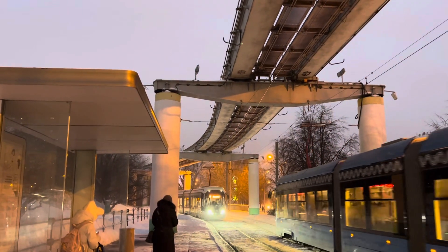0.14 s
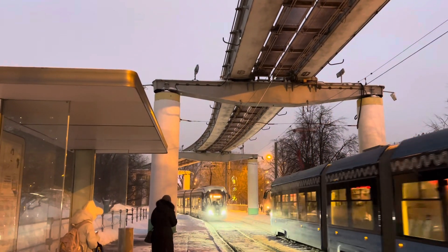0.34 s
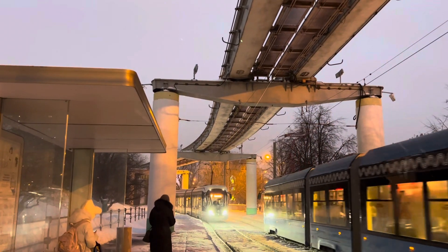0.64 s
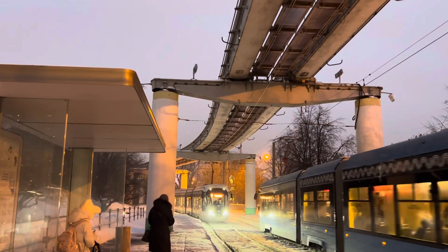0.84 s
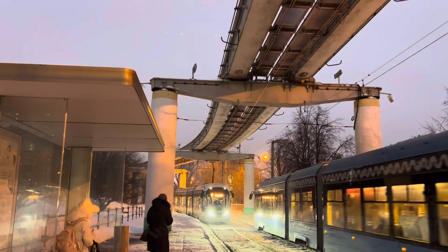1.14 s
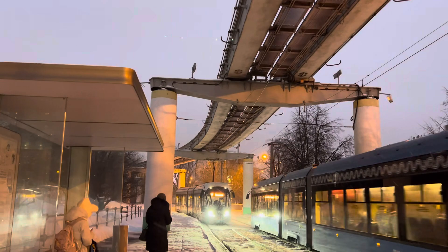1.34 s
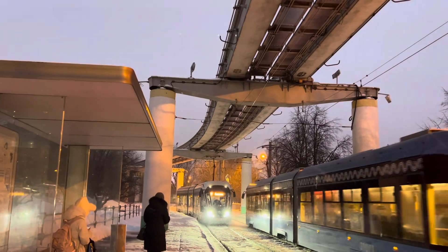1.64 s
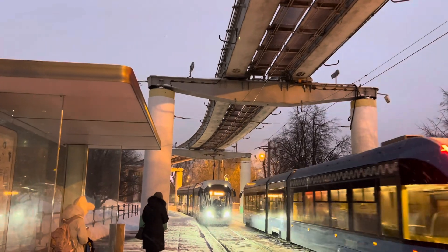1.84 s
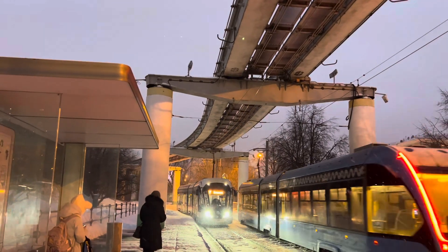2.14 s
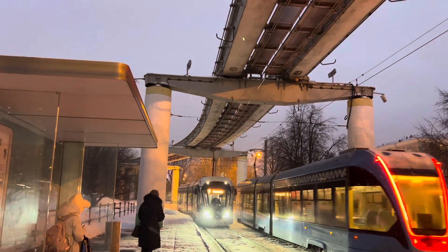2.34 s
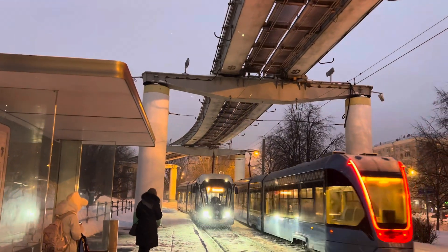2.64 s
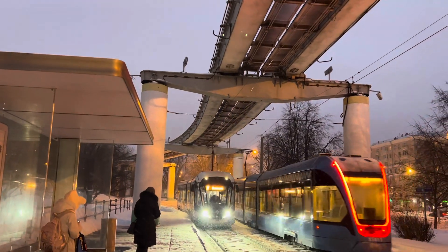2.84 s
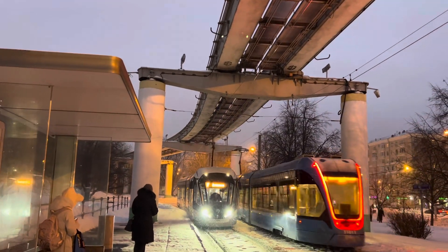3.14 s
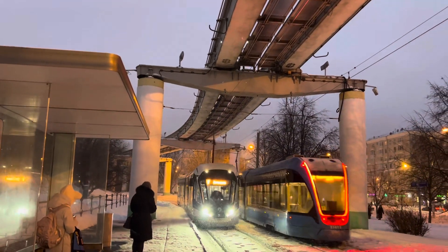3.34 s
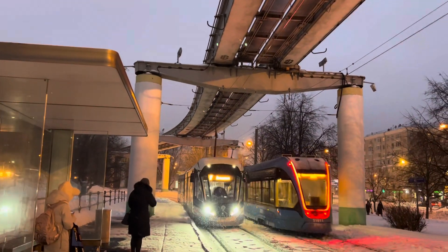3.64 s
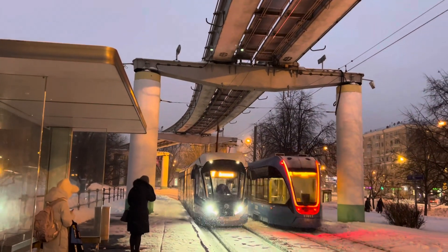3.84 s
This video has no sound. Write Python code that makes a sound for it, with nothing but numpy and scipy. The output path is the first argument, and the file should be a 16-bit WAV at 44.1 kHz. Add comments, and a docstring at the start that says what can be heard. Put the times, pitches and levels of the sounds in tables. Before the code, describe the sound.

Tram wheels knock dully over rail joints, densest around one second, then in spaced pairs; the rolling rumble weakens, a faint wavering whine fades, and a close phone-like microphone catches a short outdoor echo.

```python
"""Tram leaving along a snowy street

Two close microphone ports hear a tram roll away: noise bands for steel on steel, low decaying cycles,
noise bursts and ringing wheel modes for the rail joints, and wavering sines for the whine of the motor drive.
The rails sing as narrow noise, a small compressor ticks in steady puffs, and a few bright snaps stand out.
The street answers the blows with a short noisy echo."""
import sys
import numpy as np
from scipy import signal
from scipy.fft import rfft, irfft, next_fast_len
from scipy.io import wavfile
from scipy.ndimage import uniform_filter1d, map_coordinates

SR = 44100
rng = np.random.default_rng(int(sys.argv[2]) if len(sys.argv) > 2 else 0)


def master_out(mix):
    """Clip the mix to full scale and print it as 16-bit PCM to the path in sys.argv[1]."""
    frames = np.transpose(np.atleast_2d(mix))
    ceiling = np.clip(frames, -1, 1)
    pcm = np.round(ceiling * 32767).astype(np.int16)
    wavfile.write(sys.argv[1], SR, pcm)


N = 176400

# Rolling noise as the tram leaves. Each row: time in seconds, then rumble, roar, hiss and treble levels in dB.
ROLLING_LEVELS = [(0.0, -16, -28, -44.5, -53), (0.38, -22, -30.5, -46.5, -54.5),
                  (0.8, -23, -31, -44.5, -53), (1.09, -32.5, -37.5, -44, -52.5),
                  (1.32, -30, -37.5, -48.5, -54), (1.48, -38.5, -33, -46.5, -58),
                  (1.64, -22.5, -36, -52, -57.5), (1.77, -29, -34, -50, -57.5),
                  (1.98, -28.5, -36.5, -52.5, -58), (2.18, -30, -37.5, -51, -59),
                  (2.62, -32, -37, -51.5, -60), (2.9, -36, -39.5, -48.5, -58.5),
                  (3.11, -32, -39.5, -51, -56.5), (3.22, -29.5, -38, -52.5, -58),
                  (3.52, -35, -38.5, -46, -55), (3.66, -34.5, -40, -49, -53.5),
                  (4.0, -30.5, -36.5, -51, -52)]
# Colours of the four rolling bands. Each row: frequency in Hz, relative density in dB per Hz.
RUMBLE_COLOUR = [(22, -49), (38, -1.5), (54, 6.5), (68, 5), (110, -4.5), (140, -25), (240, -120)]
ROAR_COLOUR = [(62, -48.5), (105, -4), (259, -13.5), (342, -21), (461, -23), (570, -20.5), (681, -23),
               (1000, -32.5), (1350, -36), (1950, -41.5), (3300, -120)]
HISS_COLOUR = [(820, 3), (1400, -1.5), (1960, -3.5), (2250, -4), (2820, -4.5), (4700, -8), (6110, -23.5),
               (10300, -120)]
TREBLE_COLOUR = [(4500, -3.5), (5330, -3.5), (5580, -7.5), (6230, -5.5), (7490, -7), (8610, -13),
                 (9050, -19.5), (9760, -68), (10400, -55.5), (10700, -26), (11400, -12.5), (14800, -19.5)]

# Front motor whine. Each row: time in seconds, level in dB, pitch shift in Hz.
FRONT_MOTOR = [(.15, -76, -16.5), (.27, -53.5, -20), (.6, -60, -7), (1.3, -51.5, -5), (1.36, -57.5, 2),
               (1.45, -50.5, -2), (1.7, -51.5, 2), (1.82, -59.5, 0.5), (1.95, -53, -3), (2.25, -57.5, 1),
               (2.33, -61.5, -7), (2.6, -66, -2), (2.8, -88, 4)]
# Rear motor, still closing in. Each row: time in seconds, level in dB.
REAR_MOTOR_LEVEL = [(.15, -81), (.3, -60), (.85, -56.5), (1.2, -59), (1.45, -61), (1.8, -98)]
# Switching tones of both motors. Each row: frequency in Hz before the shift, dB relative to the motor level.
SWITCHING_TONES = [(4856, -4), (4933, -6), (5010, -3), (5082, -16), (7343, -20), (7424, -22)]
REAR_SHIFT_HZ = 30
FRONT_WAVER_HZ, REAR_WAVER_HZ = 3.5, 14  # random pitch waver, standard deviation of its knots
# Rails singing as the tram passes. Each row: time in seconds, level in dB.
RAIL_LEVEL = [(.5, -62), (.8, -52), (1.4, -55), (1.6, -73.5)]
# Colour of the singing rail. Each row: frequency in Hz, relative density in dB per Hz.
RAIL_COLOUR = [(1200, -120), (1900, -27.5), (2200, 3.5), (2420, 1), (2620, -1), (3600, -13), (5000, -120)]

TICK_FIRST_S, TICK_EVERY_S = 0.02, 0.045
TICK_DB, TICK_ATTACK_DECAY_S = -62, (0.003, 0.005)
# Colour of a compressor tick. Each row: frequency in Hz, relative density in dB per Hz.
TICK_COLOUR = [(4200, -120), (5200, -15), (6200, 0), (7400, -15), (8800, -120)]

# Bright snaps, most on hard blows. Each row: start in seconds, level in dB, decay in seconds.
SNAP_EVENTS = [(0.076, -41.5, 0.001), (.920, -47, 0.0046), (2.632, -48.5, 0.0087), (2.988, -51.5, 0.0052)]
# Colour of a snap. Each row: frequency in Hz, relative density in dB per Hz.
SNAP_COLOUR = [(4000, -120), (6000, -4), (8000, 2.5), (10000, -14), (14000, -1)]

# Wheels at rail joints. Each row: time in seconds, thump peak in dB, thump pitch in Hz,
# then deep boom, body, knock and clank levels in dB.
JOINT_BLOWS = [(0.165, -8, 150, -13.5, -28, -37, -55), (0.422, -22, 185, -19.5, -37.5, -41, -44.5),
               (0.921, -14, 134, -10.5, -26, -29, -37.5), (0.945, -11.5, 151.5, -9, -26.5, -42.5, -39.5),
               (1.018, -19, 126, -16.5, -46, -58, -45.5), (1.162, -21, 127, -21.5, -43.5, -57.5, -49.5),
               (1.241, -11, 136.6, -14, -22.5, -34.5, -35), (1.266, -7.5, 140.2, -18, -39, -39, -49.5),
               (1.276, -12, 126, -28, -38.5, -45, -63), (1.411, -14, 145, -18, -32, -38.5, -46.5),
               (1.744, -9, 151, -26, -34.5, -40, -53), (1.764, -37, 164, -36, -31, -39.5, -58),
               (2.028, -22, 173.7, -30, -37, -44, -60), (2.067, -20.5, 128, -36, -52, -50, -61),
               (2.393, -24, 152, -34, -42, -42.5, -57), (2.633, -16, 172, -21.5, -36.5, -38, -41),
               (2.651, -16, 136, -26, -41, -48, -60), (2.991, -9, 162.7, -41, -32.5, -41.5, -47.5),
               (3.012, -32.5, 172, -34, -31.5, -43, -55), (3.155, -16, 142, -37, -30.5, -35.5, -47),
               (3.178, -20.5, 143, -31, -30, -46, -51), (3.514, -12.5, 153.7, -19, -44, -39, -47),
               (3.532, -25, 131, -18.5, -33.5, -39, -54), (3.714, -27, 184, -30, -27.5, -39.5, -56),
               (3.736, -20.5, 161.7, -22.5, -28.5, -38.5, -51), (3.766, -35, 133, -28.5, -44.5, -62, -59),
               (3.812, -21, 130, -26, -32, -48, -56), (3.848, -25.5, 132, -18, -40, -48.5, -60)]
BOOM_HZ = 79.7
THUMP_SWELL_S, BOOM_SWELL_S = 0.0027, 0.005  # the swell peaks after four of these
THUMP_EARLY_S = 0.0031
# Attack and decay in seconds of the noisy parts of a blow.
BODY_S, KNOCK_S, CLANK_S = (0.0066, 0.013), (0.0045, 0.014), (0.00044, 0.014)
# Colours of the noisy parts. Each row: frequency in Hz, relative density in dB per Hz.
BODY_COLOUR = [(100, -120), (170, 2), (230, 10.5), (350, 0.5), (480, -4), (700, -48), (1500, -120)]
KNOCK_COLOUR = [(280, -120), (500, 7), (900, 4), (1500, -3), (2200, -10.5), (4000, -120)]
CLANK_COLOUR = [(500, -120), (1000, -23), (2000, 4.5), (3500, 5.5), (5500, -7), (8000, -12), (10000, -120)]
# Ringing modes of a wheel. Each row: frequency in Hz, relative level in dB, 60 dB decay time in seconds.
WHEEL_MODES = [(1036, 1, 0.04), (1523, -2, 0.02), (2310, -6, 0.1), (3217, -11, 0.11), (3570, -3.5, .06),
               (4500, -6.5, 0.027)]
WHEEL_DB, WHEEL_SPLIT_HZ = 0.5, 2000  # over the blow; low modes follow the knock, high ones the clank

STREET_DB, STREET_T60_S = -9, 0.26

# Likeness of the two ports. Each row: frequency in Hz, left-right likeness from 0 to 1.
PORT_LIKENESS = [(60, .99), (200, 0.96), (350, 0.79), (700, 0.44), (2000, 0.83), (5000, 0.52), (10000, 1),
                 (14000, .85)]
# Lead of the left port. Each row: frequency in Hz, phase lead in radians.
LEFT_LEAD = [(0, 0), (1460, -2.0), (1810, -0.1), (2840, 0.5), (5000, 0.1), (5770, -1.5), (6370, 0.0),
             (7240, -0.1), (8100, -0.7), (9040, -3.0), (10900, -3.3), (11800, -6.3), (13700, -6.2),
             (14600, -8.6)]
# Lean to the left port. Each row: frequency in Hz, left over right in dB.
LEFT_LEAN = [(60, -0.5), (200, 0), (370, 0), (690, -1.5), (1260, -2.5), (2320, 2.0), (4260, 3), (14400, -1)]
TOP_HZ = 15000


def amp(db):
    """Amplitude for a level in dB."""
    return 10 ** (np.asarray(db) / 20)


def unit(x):
    """x scaled to an rms of 1."""
    return x / np.sqrt(np.mean(x ** 2) + 1e-20)


def along(points, hz):
    """Values between (Hz, value) points on a log frequency axis."""
    f, v = np.transpose(points)
    return np.interp(np.log(hz + 1), np.log(f + 1), v)


def curves(rows):
    """One value per sample for each column after the time."""
    s, *cols = np.transpose(rows)
    return [np.interp(np.arange(N) / SR, s, c) for c in cols]


def wobble(rate):
    """A smooth random curve, rate knots a second."""
    knots = rng.standard_normal(int(N * rate / SR) + 4)
    return map_coordinates(knots, [np.arange(N) * rate / SR])


def filtered(x, response):
    """x times a complex response of frequency."""
    m = next_fast_len(N + SR // 2)
    return irfft(rfft(x, m) * response(np.fft.rfftfreq(m, 1 / SR)), m)[..., :N]


def rush(spectrum, patchy_db):
    """Two unrelated coloured noises, rms 1 together, with shared patches of random gain."""
    z = signal.stft(rng.standard_normal((2, N)), nperseg=512)[2]
    field = rng.standard_normal(z.shape[1:])
    field = uniform_filter1d(uniform_filter1d(field, 6, 0), 12, 1)  # smooth over frequency, then time
    pair = signal.istft(z * amp(patchy_db * unit(field)), nperseg=512)[1][:, :N]
    return unit(filtered(pair, lambda hz: amp(along(spectrum, hz))))


def bursts(times, levels_db, attack_s, decay_s):
    """An envelope that rises at each time and dies away."""
    spikes = np.bincount(np.round(np.asarray(times) * SR).astype(int), amp(levels_db), N)[:N]
    t = np.arange(SR // 4) / SR
    shape = (1 - np.exp(-(t / attack_s) ** 2)) * np.exp(-t / decay_s)
    return signal.fftconvolve(spikes, shape / shape.max())[:N]


def rolling():
    """Steel on steel and the street behind it: four noise bands, roar and hiss sharing a slow flicker."""
    rumble_db, roar_db, hiss_db, treble_db = curves(ROLLING_LEVELS)
    shared_db = 0.6 * wobble(6)
    rumble = amp(rumble_db + 0.25 * wobble(6.5)) * rush(RUMBLE_COLOUR, patchy_db=0.77)
    roar = amp(roar_db + shared_db + 1.1 * wobble(29.97)) * rush(ROAR_COLOUR, patchy_db=1.5)
    hiss = amp(hiss_db + 1.4 * shared_db) * rush(HISS_COLOUR, patchy_db=2.5)
    treble = amp(treble_db) * rush(TREBLE_COLOUR, patchy_db=2.5)
    return rumble + roar + hiss + treble


def motor(level_db, shift_hz, waver_hz):
    """Switching tones of one motor: sines that each waver on their own in level and pitch."""
    total = 0
    for tone_hz, tone_db in SWITCHING_TONES:
        gain = amp(level_db + tone_db + 2.04 * wobble(7.69) + 3.2 * wobble(39.9))
        hz = tone_hz + shift_hz + waver_hz * wobble(25)
        phase = 2 * np.pi * np.cumsum(hz) / SR
        total = total + gain * np.sin(phase + rng.uniform(0, 2 * np.pi, (2, 1)))
    return total


def singing_rail():
    """The rails ring as a narrow band of noise."""
    return amp(*curves(RAIL_LEVEL)) * rush(RAIL_COLOUR, patchy_db=-1.0)


def whine():
    """The two motors of the drive and the singing rail."""
    front = motor(*curves(FRONT_MOTOR), FRONT_WAVER_HZ)
    rear = motor(*curves(REAR_MOTOR_LEVEL), REAR_SHIFT_HZ, REAR_WAVER_HZ)
    return front + rear + singing_rail()


def ticking():
    """The compressor gives a short metallic puff once a turn, a little uneven in time and level."""
    s = np.arange(TICK_FIRST_S, N / SR - 0.01, TICK_EVERY_S)
    chance = rng.standard_normal((len(s), 2))
    times = np.abs(s + 0.0022 * chance[:, 0])
    puffs = bursts(times, TICK_DB + 1.7 * chance[:, 1], *TICK_ATTACK_DECAY_S)
    return puffs * rush(TICK_COLOUR, patchy_db=1.0)


def snaps():
    """Brief treble clicks: noise under fast envelopes."""
    envelope = sum(bursts([s], [db], 0.0004, decay) for s, db, decay in SNAP_EVENTS)
    return envelope * rush(SNAP_COLOUR, patchy_db=0.5)


def swell(t, hz, rise_s):
    """A few low cycles that swell and die, their envelope peaking at 1."""
    return (t / rise_s / 4) ** 4 * np.exp(4 - t / rise_s) * np.cos(2 * np.pi * hz * t)


def wheel_ring(t, knock_db, clank_db):
    """The modes of a struck wheel, each varying a little in level and pitch from blow to blow."""
    mode_hz, mode_db, t60 = np.transpose(WHEEL_MODES)[..., None]
    chance = rng.standard_normal((2, len(WHEEL_MODES), 1))
    blow_db = np.where(mode_hz < WHEEL_SPLIT_HZ, knock_db, clank_db)
    level_db = blow_db + WHEEL_DB + mode_db + 1.9 * chance[0]
    hz = mode_hz * (1 + 0.015 * chance[1])
    ring = amp(level_db - 60 * t / t60) * np.sin(2 * np.pi * hz * t)
    return ring.sum(0) * (1 - np.exp(-t / 0.00039))


def joints():
    """Each wheel drop swells into low cycles and rings the wheel, with noisy knocks dying band by band."""
    s, thump_db, thump_hz, boom_db, body_db, knock_db, clank_db = np.transpose(JOINT_BLOWS)
    t, tonal = np.arange(SR // 5) / SR, np.zeros(N + SR)
    blows = zip(s - THUMP_EARLY_S, thump_db, thump_hz, boom_db, knock_db, clank_db)
    for at, thump, hz, boom, knock, clank in blows:
        low = amp(thump) * swell(t, hz, THUMP_SWELL_S) + amp(boom) * swell(t, BOOM_HZ, BOOM_SWELL_S)
        tonal[round(at * SR):][:len(t)] += low
        tonal[round((at + 0.001) * SR):][:len(t)] += wheel_ring(t, knock, clank)
    noisy = 0
    for db, shape, colour in [(body_db, BODY_S, BODY_COLOUR), (knock_db, KNOCK_S, KNOCK_COLOUR),
                              (clank_db, CLANK_S, CLANK_COLOUR)]:
        noisy = noisy + bursts(s - 0.002, db, *shape) * rush(colour, patchy_db=2)
    return tonal[:N] * [[1], [0]] + noisy  # the tonal part goes only to what the ports share


def street(x):
    """Walls, shelter and viaduct answer the blows: a decaying noise tail after a short delay."""
    t = np.arange(SR // 2) / SR
    tail = amp(-60 * t / STREET_T60_S) * rng.standard_normal((2, len(t)))
    delayed = np.pad(x, ((0, 0), (600, 0)))  # 600 samples
    return signal.fftconvolve(delayed, tail / np.linalg.norm(tail[0]), axes=1)[:, :N]


def ports(pair):
    """Two close microphone ports: a shared part with a lead and a lean, and a part that differs."""
    def gains(hz):
        turn = np.arccos(np.clip(along(PORT_LIKENESS, hz), 0, 1)) / 2
        side = np.array([[1], [-1]])  # left, right
        lead = np.interp(hz, *np.transpose(LEFT_LEAD))
        port = amp(side * along(LEFT_LEAN, hz) / 2) * np.exp(0.5j * side * lead)
        shared, own = port * np.cos(turn), side * port * np.sin(turn)
        middle = np.sqrt(abs(shared.mean(0)) ** 2 + abs(own.mean(0)) ** 2)
        return np.array([shared, own]) / middle  # keeps the mono level
    return filtered(pair[:, None], gains).sum(0)  # first of the pair is shared, second differs


def scene():
    """The tram, its compressor and the street's answer, as heard at the two ports."""
    blows = joints()
    echo = amp(STREET_DB) * street(blows)
    return ports(rolling() + whine() + ticking() + snaps() + blows + echo)


def record(dry):
    """The recorder keeps nothing at or above its band limit."""
    return filtered(dry, lambda hz: hz < TOP_HZ)


dry = scene()
out = record(dry)
master_out(out)
```